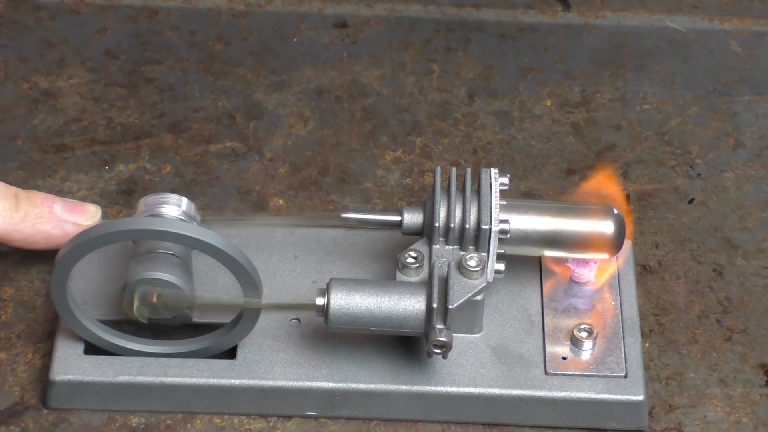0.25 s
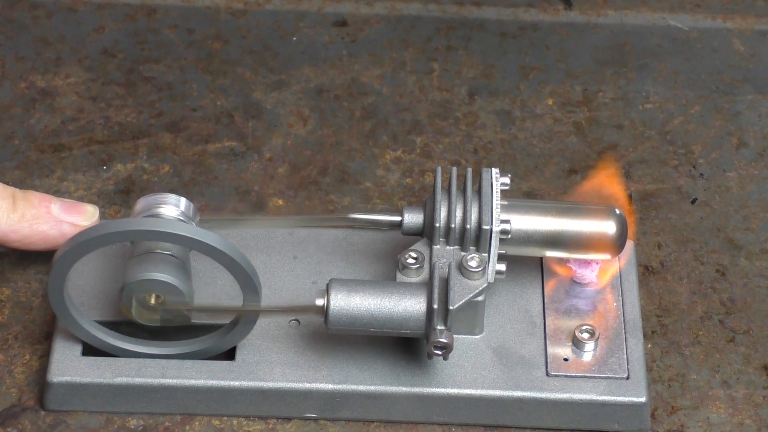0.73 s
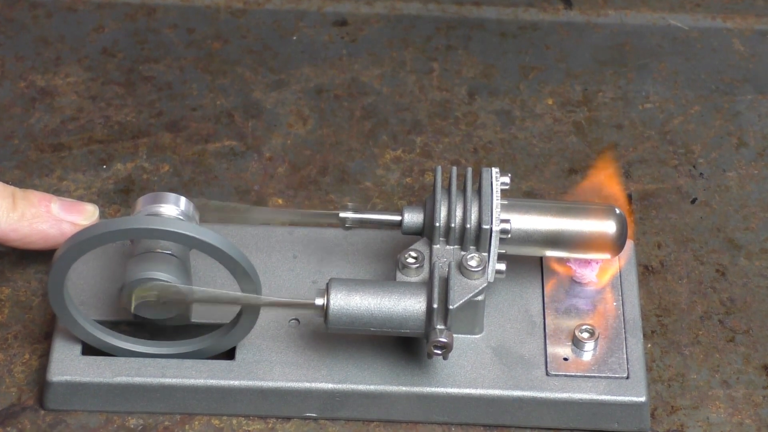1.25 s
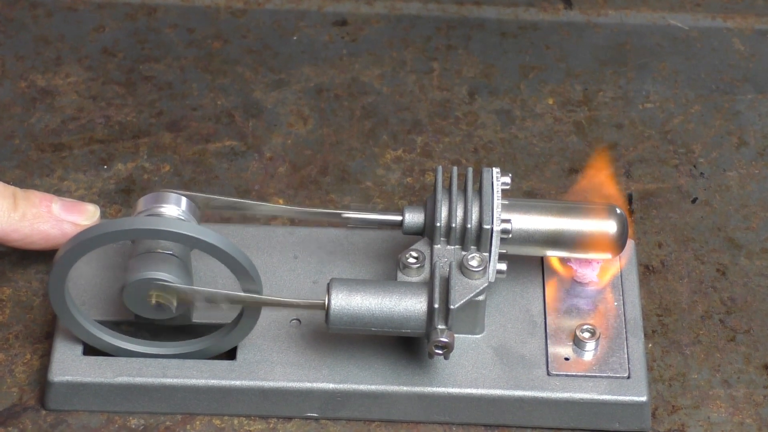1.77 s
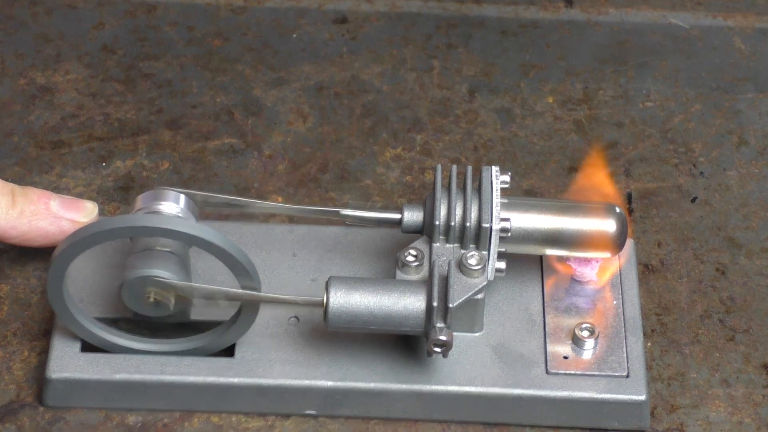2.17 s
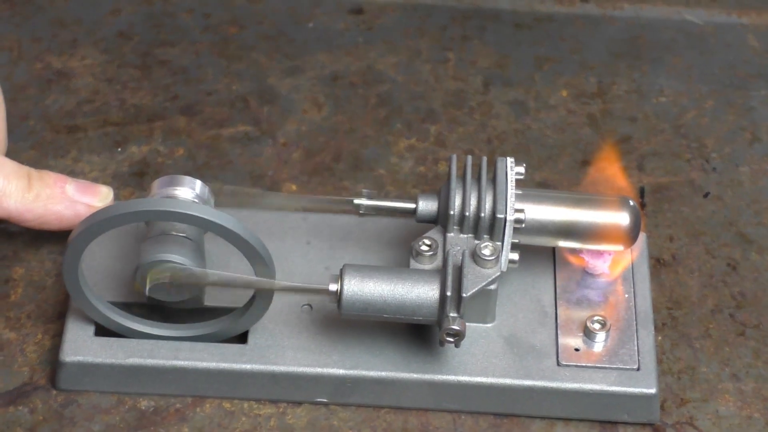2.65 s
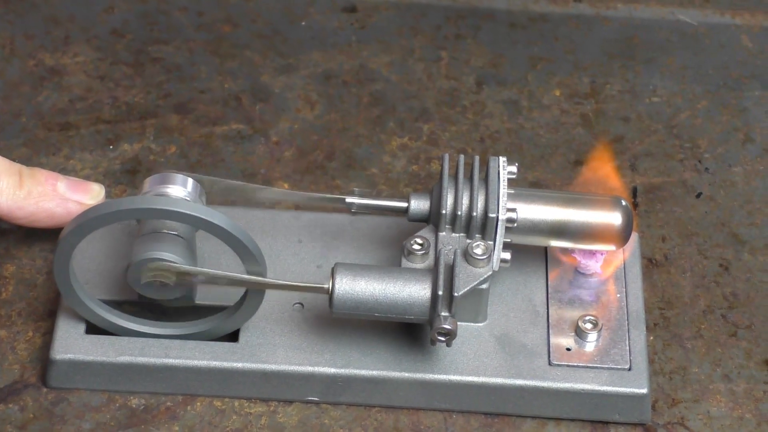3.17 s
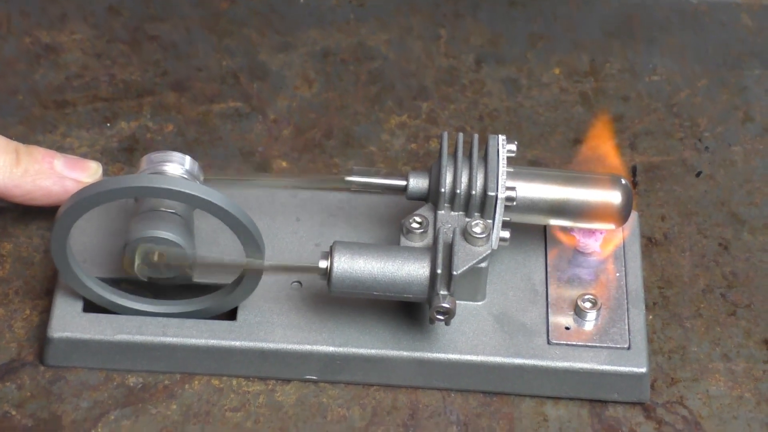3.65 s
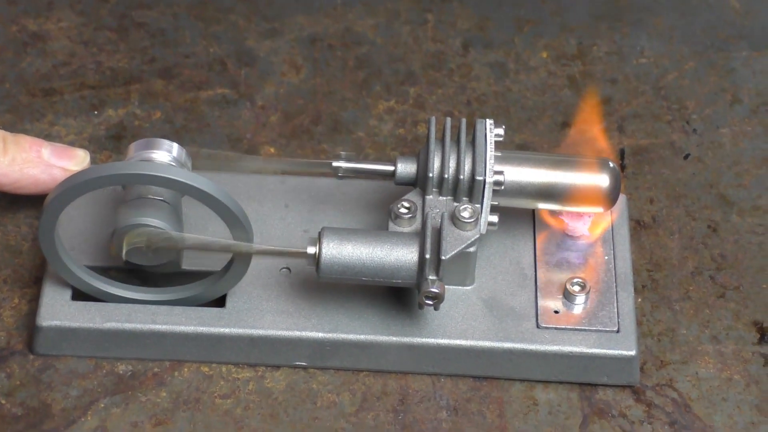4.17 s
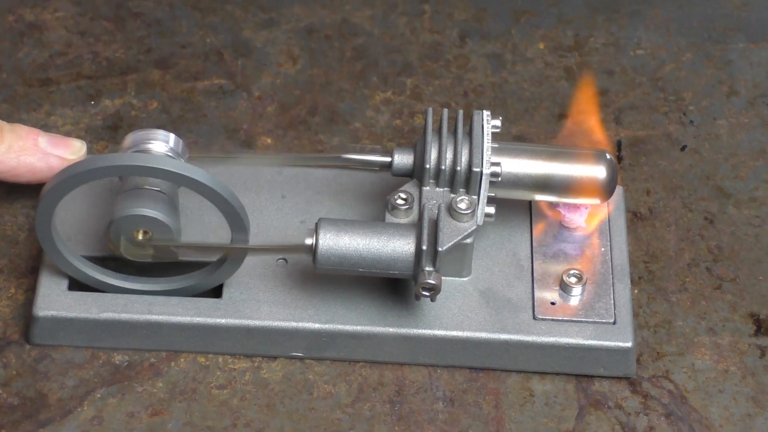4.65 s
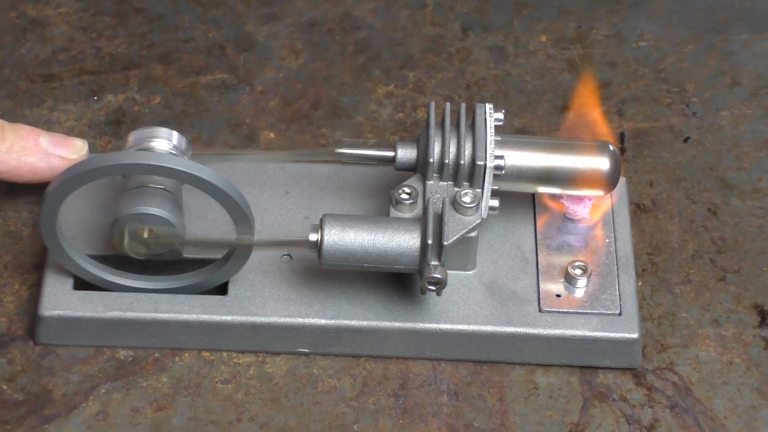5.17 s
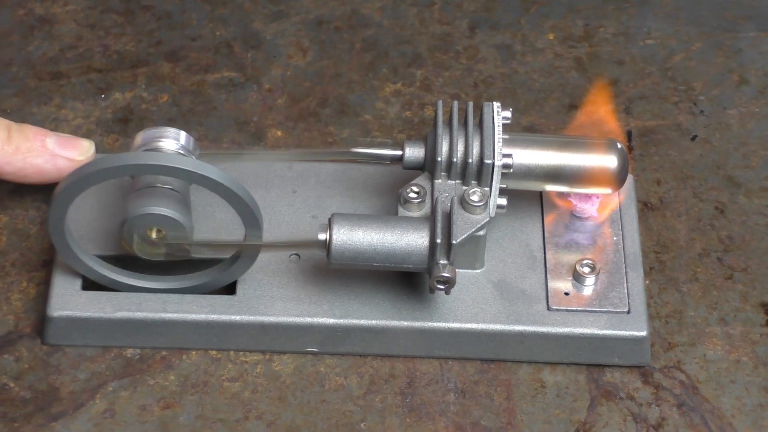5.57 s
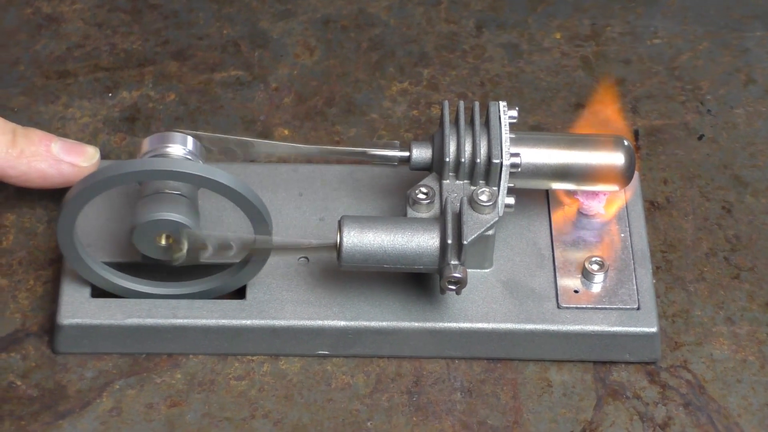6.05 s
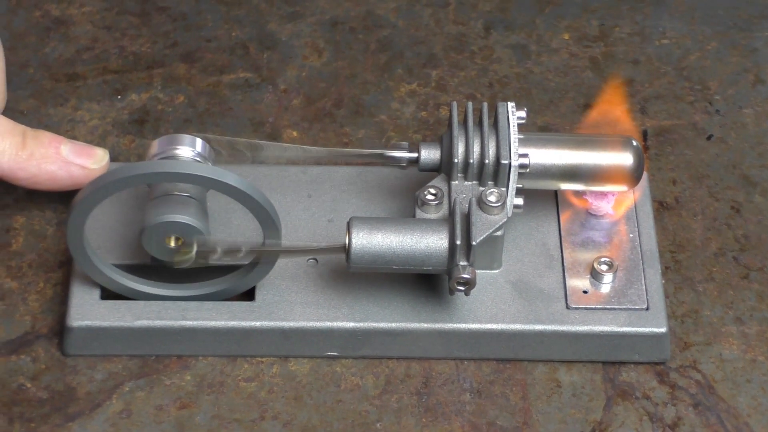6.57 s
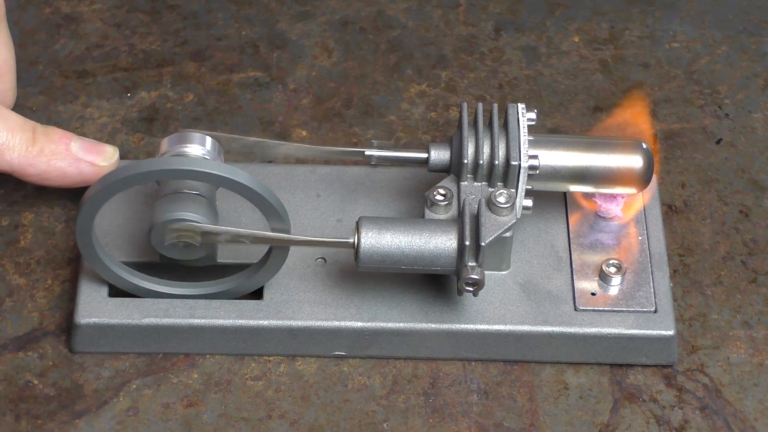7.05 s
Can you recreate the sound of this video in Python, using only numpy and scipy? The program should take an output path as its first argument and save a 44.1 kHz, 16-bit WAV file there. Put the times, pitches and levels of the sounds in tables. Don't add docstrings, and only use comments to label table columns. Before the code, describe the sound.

A small hot-air engine runs fast and steadily up close, squeaking, scraping and clattering about fifteen times a second, its rattle hardening near the end.

```python
import sys
import numpy as np
from scipy import signal
from scipy.fft import rfft, irfft, next_fast_len
from scipy.io import wavfile

SR = 44100
rng = np.random.default_rng(int(sys.argv[2]) if len(sys.argv) > 2 else 0)


def output_pcm(signal):
    pcm = np.clip(np.atleast_2d(signal).T, -1, 1) * 32767
    wavfile.write(sys.argv[1], SR, np.round(pcm).astype(np.int16))


def gain_from_db(level_db):
    decades = np.asarray(level_db, float) / 20
    return 10 ** decades


N = 322812
TIME = np.arange(N) / SR
SIZE = next_fast_len(N + SR // 3)
HZ = np.arange(SIZE // 2 + 1) * SR / SIZE
TURN_COUNT = 116


def shape(x, response):
    return irfft(rfft(x, SIZE) * response, SIZE)[:N]


def colour(points):
    hz, db = np.transpose(points)
    return gain_from_db(np.interp(np.log(HZ + 1), np.log(hz), db))


def modes(table, lift_db, sense=-1):
    hz, width, *db = np.transpose(table)
    resonances = 1 / (1 + 2j * (HZ - hz[:, None]) / width[:, None])
    gains = gain_from_db(np.array(db) + lift_db) * sense ** np.arange(len(hz))
    return (gains + 0j) @ resonances


def grit(angle, rate, spread_db, smooth):
    spots = SR // 15
    sizes = gain_from_db(spread_db * rng.exponential(size=spots).clip(0, 3))
    sizes = sizes * (rng.random(spots) < rate / SR)
    late = .004 * rng.standard_normal(TURN_COUNT)[angle.astype(int)]
    spot = ((angle + late) % 1 * spots).astype(int) % spots
    hits = sizes[spot] * rng.choice([-1, 1], N)
    x = hits / hits.std() + smooth * rng.standard_normal(N)
    return x / x.std()


# (time [s], speed [turns/s])
SPEED = [(0, 14.713), (1, 14.879), (2, 15.027), (3, 15.149), (4, 15.156), (5, 15.194), (6.4, 15.229),
         (7.32, 15.468)]


def crank():
    start_turns = .431
    return start_turns + np.cumsum(np.interp(TIME, *np.transpose(SPEED))) / SR


def turn_starts(angle):
    return np.interp(np.arange(TURN_COUNT), angle, TIME)


def per_turn(angle, db, at):
    return gain_from_db(np.interp(angle - at, np.arange(len(db)), db))


def contacts(angle, table, scatter_db, slack):
    power = 0
    for at, rise, decay, db in table:
        turn = np.floor(angle - at + .5).astype(int)
        chance = rng.standard_normal((TURN_COUNT, 2))[turn]
        u = angle - at - turn - slack * chance[:, 0]
        swell = np.where(u < 0, np.exp(-(u / rise) ** 2), np.exp(-np.abs(u) / decay))
        power = power + (swell * gain_from_db(db + scatter_db * chance[:, 1])) ** 2
    return np.sqrt(power)


# (frequency [Hz], level [dB per Hz])
ROOM = [(20, -50), (60, 0.5), (125, -3), (170, -4.5), (500, -15), (1200, -10.5), (2500, -11), (6000, -18),
        (9000, -36), (15500, -43)]
# (time [s], half length [s], level over steady draught [dB])
GUSTS = [
    (.6, .2, -9),
    (2.0, .08, -9),
    (2.947, .17, 6),
    (3.28, .1, -8),
    (5.2, 0.46, 8.5),
    (5.683, 0.19, 10.5),
]


def workshop():
    room = shape(rng.standard_normal(N), colour(ROOM))
    room *= gain_from_db(-34) / room.std()
    rumble_band = np.exp(-(HZ / 55) ** 2) * (1 - np.exp(-(HZ / 12) ** 2))
    draught = shape(rng.standard_normal(N), rumble_band)
    draught_db = -42.0
    for s, half, db in GUSTS:
        draught_db = draught_db + db * np.exp(-((TIME - s) / half) ** 2)
    return room + gain_from_db(draught_db) * draught / draught.std()


# (crank angle [turns], width [turns], level [dB])
JOLTS = [(.235, .024, -27), (.355, .03, -21.5), (.55, .03, -32), (.63, .03, -33), (.76, .03, -28),
         (.88, .038, -23.5)]
# (frequency [Hz], level [dB])
BENCH = [(1, -70), (10, -17), (30, -2), (60, 4), (90, -0.5), (120, 3.5), (160, -4.5), (230, -30)]


def bench(angle):
    push = 0
    for at, width, db in JOLTS:
        turn = np.floor(angle - at + .5).astype(int)
        size = gain_from_db(db + 1.0 * rng.standard_normal(TURN_COUNT))[turn]
        push = push + size * np.exp(-((angle - at - turn) / width) ** 2)
    return shape(push, colour(BENCH))


# (time [s], looseness [0-1])
LOOSE = [
    (0, 0.16),
    (5.55, 0.1),
    (5.68, 0.97),
    (6.3, 0.6),
    (6.6, 0.95),
    (7.32, 0.7),
]
# (time [s], level [dB])
ODD_KNOCKS = [(.425, -4), (.56, -4), (.9, 2), (1.03, -7), (1.3, -4), (1.37, -6), (1.77, 3), (2.3, -4),
              (2.435, 2), (2.7, -4), (2.765, 3), (2.9, 2), (3.095, 3), (3.16, 2), (3.23, 2), (3.295, -4),
              (3.425, 3), (3.56, 2), (3.755, 3), (3.89, -8), (4.94, 3), (5.27, -4), (5.535, -4), (5.665, 5),
              (6.125, 4), (7.3, 4)]


def knocks(angle):
    firm_db, loose_db, scatter_db = -1, 1.8, 1.2
    loose = np.interp(turn_starts(angle), *np.transpose(LOOSE))
    db = firm_db + loose * (loose_db - firm_db) + scatter_db * rng.standard_normal(TURN_COUNT)
    for s, odd_db in ODD_KNOCKS:
        db[int(angle[int(s * SR)])] = odd_db
    return per_turn(angle, db, at=.72)


# (frequency [Hz], width [Hz], level seated firmly [dB], level seated loosely [dB])
BASE = [(242, 48, -46, -48.5), (287, 25, -46.5, -42), (340, 43, -44.5, -41.5), (452.4, 19.5, -43.5, -37.5),
        (510.5, 24.2, -40.5, -40.5), (556.5, 26.3, -44.5, -41.5), (657, 23.4, -45, -57),
        (742, 34.5, -47, -50), (906, 26, -40, -41.5), (992, 51, -57.5, -38.5), (1091, 34, -45, -38.5),
        (1182.5, 28, -37.5, -44), (1315.6, 25.5, -39.5, -44.5), (1384, 34, -41.5, -44.5),
        (1461, 56, -45.5, -47.5), (1556, 9.8, -39, -44), (1718, 95, -50, -48.5), (1852, 15, -57, -40),
        (1832, 123, -55, -46), (2063, 22.5, -46, -52.5), (2169, 42, -50, -48.5), (2457, 7.1, -59, -47.5)]
BUZZ = [(2880, 23, -78, -42), (2894, 16, -75, -57)]
# (crank angle [turns], rise [turns], decay [turns], level [dB])
RATTLE = [(.05, .08, .1, -1), (.2, .06, .1, 0), (.3, .06, .1, -3), (.42, .05, .1, -1), (.56, .05, .06, -3),
          (.66, .02, .03, 3), (.72, .03, .09, 2), (.87, .05, .08, 0)]
BOUNCES = [
    (.703, 1),
    (.775, .45),
]


def base(angle):
    strength = knocks(angle)
    rattle = grit(angle, 2500, 2.5, 1.2) * contacts(angle, RATTLE, scatter_db=1.2, slack=.012)
    rattle = rattle * strength ** .2
    struck = 0
    for at, share in BOUNCES:
        struck = struck + share * np.diff(np.floor(angle - at), prepend=0).clip(0)
    soft_push = np.exp(-(HZ / 700) ** 2) * (1 - np.exp(-(HZ / 330) ** 4))
    blow = shape(struck * strength * gain_from_db(32.5), soft_push)
    loose = np.clip(np.interp(TIME, *np.transpose(LOOSE)), 0, 1)
    rattled = modes(BASE + BUZZ, lift_db=32.0)
    pushed = modes(BASE[:9], lift_db=33, sense=1)
    out = 0
    for k, share in enumerate([1 - loose, loose]):
        out = out + shape(rattle * np.sqrt(share), rattled[k])
        out = out + shape(blow * np.sqrt(share), pushed[k])
    return out


# (time [s], level [dB])
PRESSURE = [(0, 1.5), (.9, 2.5), (1.5, 1.5), (1.95, 1.5), (2.8, 1), (3.1, 0.2), (3.9, 1.3), (5, 0.5),
            (5.4, 1.5), (7.32, 0.7)]


def pressure(angle):
    db = np.interp(turn_starts(angle), *np.transpose(PRESSURE))
    return per_turn(angle, db + .6 * rng.standard_normal(TURN_COUNT), at=.25)


# (crank angle [turns], rise [turns], decay [turns], level [dB])
SLAP = [
    (.12, .025, .02, -3),
    (.155, .015, .03, 0),
]
OUT_STROKE = [
    (.08, .05, .05, -8),
    (.2, .04, .05, -3),
    (.27, .025, .04, 1),
    (.35, .03, .05, -2),
    (.43, .03, .04, -6),
]
RETURN = [
    (.02, .03, .04, -3),
    (.48, .015, .015, -1),
    (.58, .022, .05, -1),
    (.625, .025, .02, 0),
]
KNOCK = [
    (.705, .018, .03, 0),
    (.75, .02, .04, 1),
]
RUN_OUT = [
    (.82, .04, .06, 0),
    (.9, .04, .03, -2),
]
# (frequency [Hz], width [Hz], slap [dB], out-stroke [dB], return [dB],
# knock [dB], run-out [dB])
CYLINDER = [(2810, 37, -34, -29.5, -16, -17.5, -14.5), (3313, 60, -13.5, -19, -12, -13.5, -11.5),
            (3767, 230, -34, -37, -22.5, -19.5, -18.5), (4274, 32, -30, -13.5, -13.5, -15, -10),
            (4705, 78, -8, -12, -13.5, -14, -14), (5100, 37, -21, -13.5, -17, -26, -33),
            (5450, 19, -15, -20, -25, -20, -11), (5610, 57, -18, -10.5, -14.5, -13, -31),
            (5946, 55, -6, -8, -5.5, -9, -8), (6200, 46, -7, -10.5, -11, -20, -12),
            (6460, 57, -13, -13.5, -10.5, -28, -19.5), (6830, 34, -15, -13, -20, -42, -33),
            (6690, 44, -21, -32, -14.5, -22, -38),
            (7250, 69, -41, -14, -18, -12.5, -16), (7565, 100, -38, -17, -17.5, -16, -22.5),
        (7960, 39, -32, -16, -26, -26, -33), (8255, 105, -21, -14.5, -26, -16.5, -37),
        (8400, 59, -16, -15.5, -15, -25, -21), (8616, 56, -18.5, -15.5, -18.5, -25, -47)]
FINS = [(9210, 64, -20.5, -25, -29, -38, -34), (9740, 100, -42, -34, -30.5, -34, -34),
        (10340, 67, -28, -23, -30, -32, -31), (10700, 81, -42, -29.5, -34, -35, -30),
        (11200, 110, -21.5, -26, -33, -26, -42), (11840, 125, -26, -30, -36, -34, -34),
        (12700, 120, -26, -30, -35, -35, -40), (13070, 120, -26, -30, -31, -23, -36),
        (13600, 120, -30, -37, -35, -28, -37), (14200, 130, -31, -31, -36, -28, -36),
        (14880, 130, -28, -31, -32, -27, -33), (14900, 130, -27, -27, -32, -29, -26),
        (15100, 130, -29, -32, -32, -31, -33), (15500, 130, -27, -30, -33, -33, -35)]
# (frequency [Hz], level [dB])
HISS = [(3000, -61), (6000, -49), (8500, -62), (10000, -57.5), (12500, -65), (13800, -71), (15600, -67)]


def pistons(angle):
    effort = pressure(angle)
    rings = modes(CYLINDER + FINS, lift_db=1.5)
    out = 0
    for k, table in enumerate([SLAP, OUT_STROKE, RETURN, KNOCK, RUN_OUT]):
        touch = contacts(angle + .012, table, scatter_db=.7, slack=.006)
        drive = grit(angle, 5000, 2.3, .9) * touch
        ring = rings[k]
        if k < 2:
            drive = drive * effort
            ring = ring + gain_from_db(27) * colour(HISS)
        out = out + shape(drive, ring)
    return out


# (frequency [Hz], crank angle [turns], rise [turns], decay [turns], peak level [dB])
SINGING = [(4700, .265, .035, .18, -24), (6090, .16, .022, .035, -20), (6010, .29, .028, .07, -20.5),
           (6000, .41, .03, .06, -27), (6010, .62, .03, .05, -28), (6000, .76, .04, .05, -24.5),
           (2877, .79, .04, .1, -35.5), (2877, .02, .03, .05, -35.5)]


def singing(angle):
    wander_hz = 28
    out = 0
    for hz, *contact in SINGING:
        wander = shape(rng.standard_normal(N), np.exp(-(HZ / 60) ** 2))
        pitch = hz + wander_hz * wander / wander.std()
        tone = np.sin(2 * np.pi * np.cumsum(pitch) / SR)
        out = out + tone * contacts(angle, [contact], scatter_db=1.3, slack=.005)
    return out


# (time [s], peak level [dB], frequency [Hz])
ODD_SQUEAKS = [(.445, -11, 4610), (1.186, -10, 4630), (1.387, -11, 4570), (1.721, -17, 4390),
               (1.855, -19, 4410), (1.922, -10, 4610), (1.988, -11, 4590), (2.321, -11, 4610),
               (2.386, -18, 4520), (2.454, -10, 4610), (3.445, -10, 4570), (3.643, -11, 4610),
               (4.038, -10, 4650), (4.169, -16, 4240), (4.435, -17, 4590), (4.698, -17, 4410),
               (4.83, -17, 4500), (5.092, -20, 4200), (5.223, -18, 4630), (5.289, -17, 4670),
               (5.421, -11, 4610), (5.487, -9, 4570), (5.816, -9, 4520), (5.948, -11, 4610),
               (6.079, -10, 4590), (6.145, -11, 4590), (6.21, -10, 4610), (6.93, -11, 4630),
               (6.995, -17, 4520), (7.19, -10, 4520)]


def squeaks(angle):
    level_db, scatter_db, slack_s = -13.7, 1.0, .0004
    usual_hz, spread_hz, sag_hz = 4660, 40, 90
    chance = rng.standard_normal((TURN_COUNT, 3)).T
    sag = rng.exponential(size=TURN_COUNT).clip(0, 4)
    rows = np.transpose([turn_starts(angle) + slack_s * chance[0],
                         level_db + scatter_db * chance[1],
                         usual_hz + spread_hz * chance[2] - sag_hz * sag])
    for row in ODD_SQUEAKS:
        rows[round(angle[int(row[0] * SR)])] = row
    return rows[1:int(angle[-1]) + 1]


def squeak(angle):
    out = np.zeros(N + 800)
    u = np.arange(-200, 200) / SR
    w = 2 * np.pi * u
    for (s, db, hz), (spin, ping) in zip(squeaks(angle), rng.standard_normal((TURN_COUNT, 2))):
        length = np.interp(hz, [4300, 4600], [.0009, .0014])
        song = np.exp(-(u / length) ** 2) * np.sin(w * hz * (1 + 2.5 * u) + 3 * spin)
        jab = gain_from_db(-10.5) * np.exp(-3 * ((u + .0005) / length) ** 2) * np.sin(w * 3950 + spin)
        late = np.exp(-((u - .0005) / .0015) ** 2) * gain_from_db(2 * ping)
        low_fin = gain_from_db(-21) * np.sin(w * 8300 + ping)
        high_fin = gain_from_db(-27) * np.sin(w * 13600 + spin)
        i = int(s * SR)
        out[i:i + 400] += gain_from_db(db - .6) * (song + jab + late * (low_fin + high_fin))
    return out[200:N + 200]


def scene():
    angle = crank()
    engine = squeak(angle) + singing(angle) + pistons(angle) + base(angle)
    t = np.arange(SR // 4) / SR
    decay = np.exp(-np.log(1000) * t / 0.36)
    tail = rng.standard_normal(len(t)) * decay * (t > .002)
    walls = gain_from_db(-14) * shape(engine, rfft(tail / np.linalg.norm(tail), SIZE))
    return (engine + walls + bench(angle) + workshop())[None]


def low_pass(x):
    return signal.sosfilt(signal.butter(12, 16030, fs=SR, output="sos"), x)


def record(dry):
    mix = shape(dry[0], HZ < 15820)[None]
    return low_pass(mix)


dry = scene()
out = record(dry)
output_pcm(out)
```